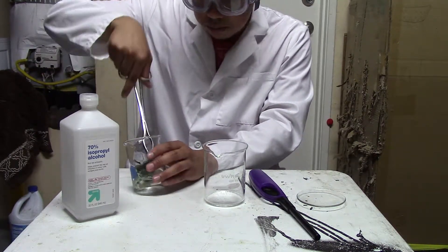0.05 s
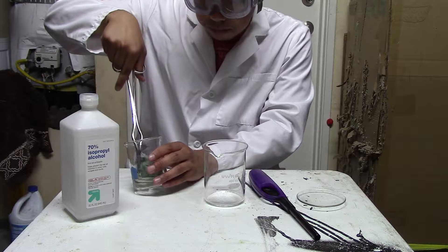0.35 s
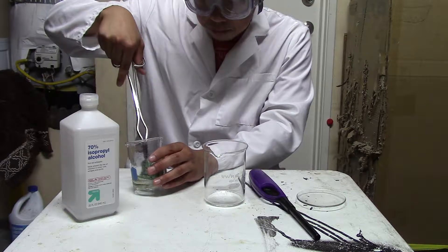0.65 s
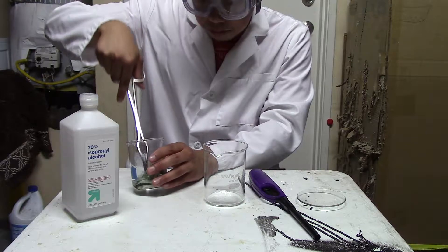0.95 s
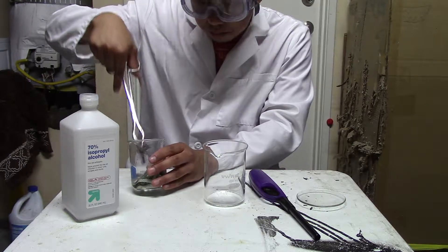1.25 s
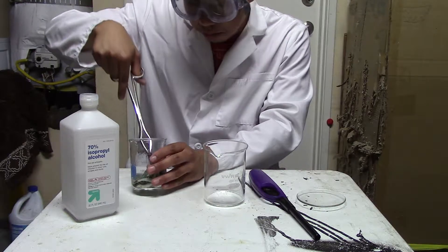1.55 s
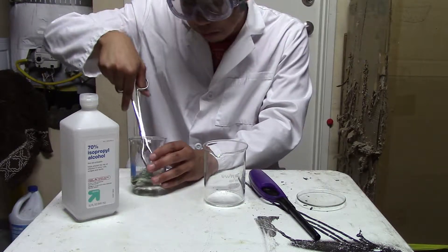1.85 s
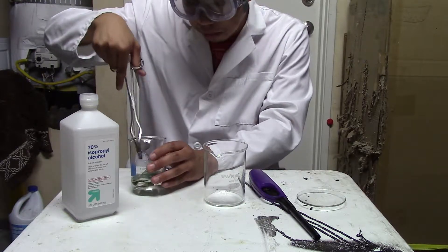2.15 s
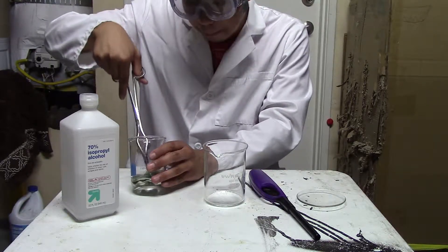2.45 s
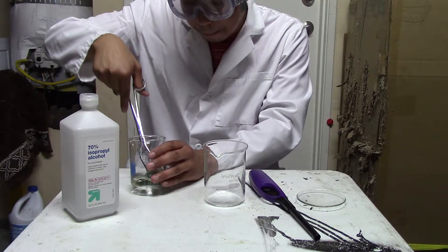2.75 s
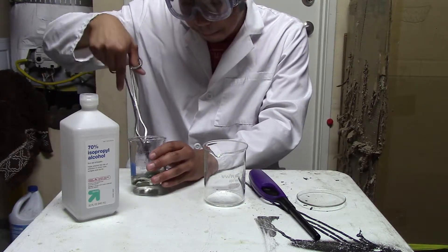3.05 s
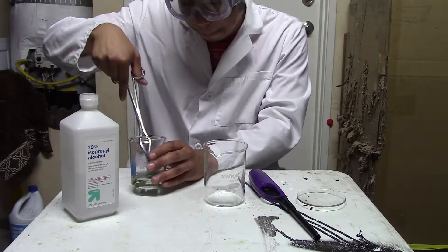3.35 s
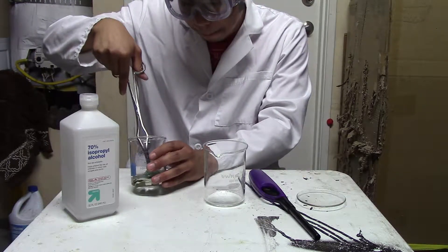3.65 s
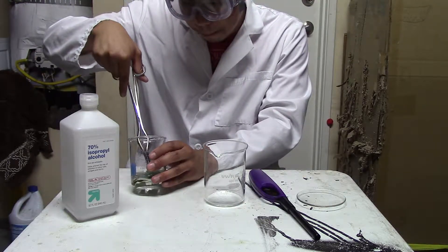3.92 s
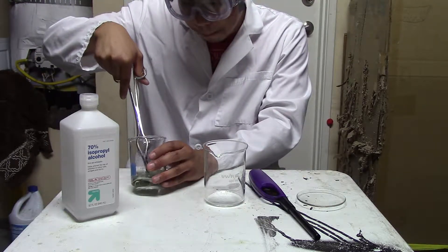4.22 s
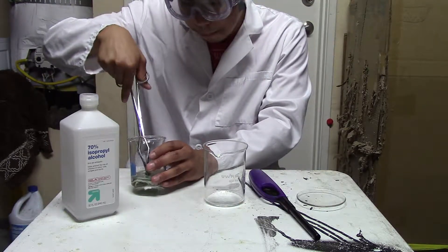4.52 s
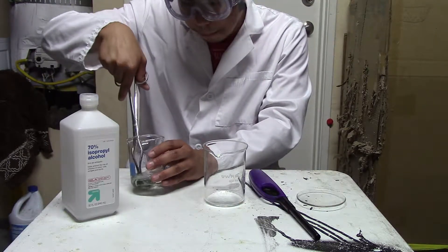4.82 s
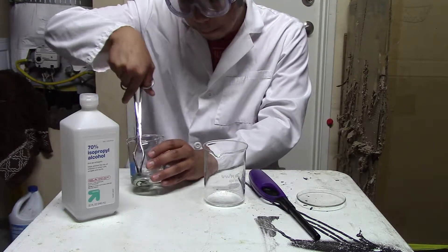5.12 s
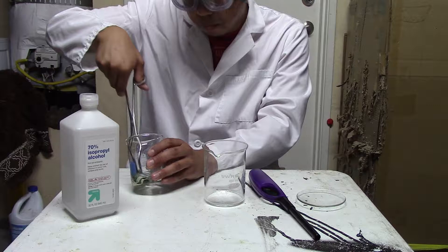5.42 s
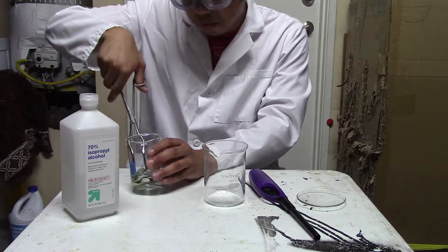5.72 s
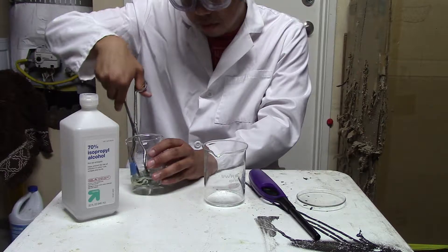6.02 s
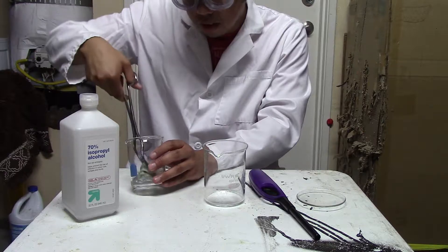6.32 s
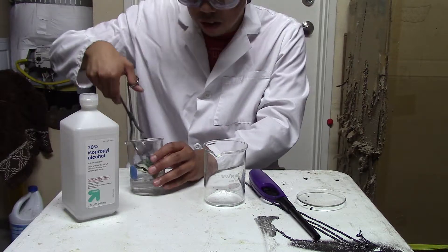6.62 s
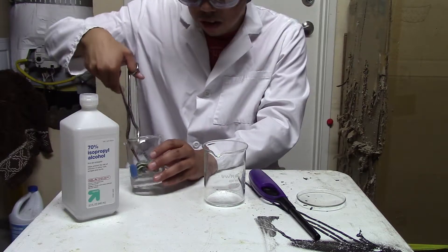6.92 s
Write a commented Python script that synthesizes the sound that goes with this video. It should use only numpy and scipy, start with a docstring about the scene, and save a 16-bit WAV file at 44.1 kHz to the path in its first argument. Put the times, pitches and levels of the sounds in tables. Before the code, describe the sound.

Short, bright clinks of metal tongs on a glass beaker, with soft rubbing and scraping between them, in a small, quiet room.

```python
"""Soft, hollow rubbing, then a bright clink: metal tongs poke at something soft in a glass beaker.
The tips strike the bottom and the wall, ringing tongs and glass and thumping the table underneath.
A hand damps the beaker, so the small, quiet room carries most of each tail. Between clinks the tongs
rub, prod, scrape and briefly squeal; the air in the beaker gives the rubbing its hollow note.
A faint motor whine comes and goes over steady room tone."""
import sys
import numpy as np
from scipy import signal
from scipy.fft import rfft, irfft
from scipy.io import wavfile
from scipy.ndimage import uniform_filter1d, minimum_filter1d

SR = 44100
rng = np.random.default_rng(int(sys.argv[2]) if len(sys.argv) > 2 else 0)


def to_wav(sig):
    """Store sig (one row per channel, or 1-D mono) as 16-bit WAV at the path in sys.argv[1].

    Samples outside -1..1 are clipped; the rate is SR.
    """
    pcm = np.clip(np.atleast_2d(sig), -1, 1) * 32767
    pcm = np.round(pcm).astype(np.int16)
    wavfile.write(sys.argv[1], SR, pcm.T)  # frames by channels


N = 307377

# blows of the tips; place runs from 0 (bottom) to 1 (wall), and a looser grip lets the glass ring longer:
# start_s, level_db, place, crack_db, t60_factor, bell_db, thud_db, bright_db_per_octave,
# accent_hz, accent_db, accent_width_octaves
CLINKS = [(1.0185, -22.5, 0.059, -6.5, 0.87, -6.5, -.5, -2.5, 9060, 4, .03),
          (1.743, -19, 0.21, -7.5, 0.75, 6.5, 0, -3, 7360, 7, .05),
          (2.6423, -33, 0.47, -12.5, 0.84, 3, -4, -5, 644, 4, 0.16),
          (2.762, -48, 0, 4, 0.5, -10, 19, -11, 349, 6, .2),
          (2.872, -46, 0.29, -2.5, 0.61, -2, -8.5, -5, 4500, 5, .2),
          (4.6265, -18, 0.66, 2.5, 0.51, 2, -6.5, 2.5, 4910, 5.5, 0.26),
          (5.3568, -60, 0.8, 0, 0.84, -5, -10, 3, 7440, 6, .04),
          (5.3941, -26, 1, -3.5, 1.3, -7, -26.5, -3, 10640, 2.5, .05),
          (5.8793, -28.5, 0.76, -2.5, 1.17, -10, -18.5, -5.5, 8500, 4, .25),
          (5.929, -56, 1, 7, .6, -5, -12, 3, 11800, 8, .2),
          (6.0657, -33.5, 0.19, -16.5, 0.73, 2, -1, -1, 3930, 0, .04),
          (6.2759, -53.5, 0.25, -5, 1, -10, 9, -4, 7940, 13, .07),
          (6.324, -54.5, 0, 3, 0.79, -7, 1, -2.5, 9300, 5, .04),
          (6.629, -51.5, 0.47, 1, 1.5, 8, -10, -10, 7950, -8, .05),
          (6.6856, -18, .25, -2.5, 0.71, 6.5, -15.5, -2, 7847, 15, .028)]
# damped modes of the tongs and the beaker: pitch_hz, t60_s, bottom_hit_db, wall_hit_db
BODY_MODES = [(243.8, 0.05, -35, -34), (350, 0.12, -16.5, -26.5), (465, 0.04, -20, -33),
              (531.7, 0.05, -14, -34), (629, 0.12, -17.5, -29.5), (860, 0.01, -22, -24.5),
              (1394, 0.031, -20, -14.5), (1409, 0.06, -15.5, -28.5), (1559, 0.027, -9.5, -37.5),
              (1744, 0.04, -17.5, -21), (1953, 0.03, -13.5, -28), (2348, 0.02, -11.5, -23.5),
              (2857, 0.05, -29, -29), (3710, 0.11, -24, -19), (3870, 0.045, -15.5, -21),
              (4143, 0.06, -13.5, -24.5), (4340, 0.049, -27, -32), (5190, 0.045, -33, -21),
              (6573, 0.036, -14, -20.5), (6740, 0.086, -16, -21), (6970, 0.045, -9, -7.5),
              (7373, 0.044, -12, -12), (7773, 0.055, -12.5, -16), (9038, 0.036, -7, -12.5),
              (10770, 0.049, -24.5, -15.5), (10996, 0.045, -17, -16), (11915, 0.043, -25.5, -25),
              (13350, 0.045, -20.5, -34), (15250, 0.03, -32.5, -34)]
# bell note of the glass wall, a close pair that beats: pitch_hz, t60_s, bottom_hit_db, wall_hit_db
BELL_MODES = [(3775, 0.12, -8.5, -18.5), (3850, 0.2, -14, -24)]
# tone of the short, noisy attack of a blow: frequency_hz, gain_db
CRACK_EQ = [(60, -45), (150, -24.5), (280, -5), (550, -2.5), (850, 1), (1200, -6.5), (1600, -5.5),
            (2600, -3), (4400, -1.5), (5900, -9), (7600, 4.5), (10000, -8), (11200, -3.5), (12500, -16.5),
            (16000, -29.5)]
# overall tone shared by all clinks: frequency_hz, gain_db
CLINK_EQ = [(80, 6.5), (200, 1.5), (350, 1), (800, -1), (1150, 0.5), (1550, 3.5), (2100, -1), (2800, -0.5),
            (4000, -3), (5200, -1.5), (6000, -3), (7000, 1), (9200, 2), (10000, 3), (11000, 1.5),
            (13200, 4.5), (14400, -4), (15300, 5.5), (16000, -1.5)]
# soft rubs inside the beaker: peak_s, swell_s, release_s, hollow_db, rustle_db
RUBS = [(.445, 0.075, 0.017, -52, -57.5), (.508, 0.026, 0.025, -47, -54), (.7, 0.036, 0.028, -60, -55.5),
        (.865, 0.1, 0.047, -56, -57), (1.01, 0.16, 0.017, -54, -52), (1.461, 0.005, .008, -70, -52.5),
        (1.574, 0.089, 0.088, -57.5, -55.5), (1.662, 0.017, .012, -41, -49),
        (1.688, 0.022, 0.014, -30.5, -57), (1.738, 0.025, .01, -54, -55), (1.985, 0.073, 0.021, -49.5, -61),
        (2.385, 0.031, 0.029, -58, -58.5), (2.595, 0.16, 0.1, -49.5, -73),
        (4.364, 0.058, 0.032, -49, -69.5), (6.51, 0.038, .06, -45.5, -55.5),
        (6.675, 0.075, .01, -56, -52.5)]
# dull pushes into the soft load: start_s, level_db
PRODS = [(1.532, -56), (2.38, -51.5), (3.325, -47), (4.863, -51.5), (6.906, -52)]
# resonances of the air in the beaker: pitch_hz, width_hz, gain_db
AIR_MODES = [(607.5, 300, -14), (965, 120, 4.5), (1028, 300, -7)]
# tone of the dry rustle: frequency_hz, gain_db
RUSTLE_EQ = [(200, -23), (700, -14.5), (1400, 0), (2000, 0.5), (2500, -7.5), (2950, -2.5), (3700, -11.5),
             (5500, -16), (8500, -12.5), (16000, -33.5)]
# tips dragging over the glass: peak_s, swell_s, release_s, level_db, tilt_db_per_octave, judder_db
SCRAPES = [(1.169, 0.068, 0.015, -39, 2, 12.5), (2.85, .07, 0.056, -43, 0, 24.5),
           (6.32, .17, 0.13, -51, -0.5, 13), (6.535, 0.082, 0.16, -54, 0, 8)]
# glide of a squealing tip: time_s, pitch_hz, level_db
SQUEAL_GLIDE = [(6.38, 5750, -62), (6.42, 6100, -65), (6.46, 6450, -66), (6.502, 6350, -71),
                (6.56, 5950, -57)]
# decay of the room: frequency_hz, t60_s
ROOM_DECAY = [(150, .55), (400, 0.29), (1000, 0.44), (2800, 0.35), (4500, 0.41), (7500, 0.41), (11000, 0.3),
              (16000, .21)]
# reverb against the direct sound: frequency_hz, wet_db
ROOM_WET = [(150, 1.5), (400, 7.5), (1500, -5), (3900, 0.5), (5300, -2), (7000, -8.5), (9000, -12),
            (15000, -3.5)]
# colour of the room tone: frequency_hz, gain_db
ROOM_TONE_EQ = [(12, -45.5), (20, -22), (101, -16.5), (138, -15), (172, -9), (262, -7), (422, -4.5),
                (472, -4.5), (513, -4), (949, -3.5), (1030, -6), (1400, -7), (5680, -16.5), (14700, -24.5),
                (16000, -44)]


def clinks(low_cut_hz=290, thump_trim_db=-48.5):
    """Each blow rings the tongs and the beaker, coloured by how the tips land, and thumps the table."""
    out = np.zeros(N)
    low_cut = signal.butter(2, low_cut_hz, "high", fs=SR, output="sos")  # small bodies radiate little bass
    for start_s, level_db, place, crack_db, t60_factor, bell_db, thud_db, *contact in CLINKS:
        clink = signal.sosfilt(low_cut, in_room(strike(place, crack_db, t60_factor, bell_db)))
        clink = colour(clink, lambda f: curve(CLINK_EQ, f) + contact_db(f, thud_db, *contact))
        thump = at_level(table_thump(), level_db + thud_db + thump_trim_db)
        add(out, start_s, at_level(clink, level_db) + thump)
    return out


def strike(place, crack_db, t60_factor=1, bell_db=0, scatter_db=.76, detune=.00079, contact_s=.0027):
    """One blow: the tips chatter for a few ms, and the modes of metal and glass ring on."""
    t = np.arange(SR // 3) / SR
    hz, t60, bottom_db, wall_db = np.transpose(BODY_MODES + BELL_MODES)[:, :, None]
    size, shift, phase = rng.standard_normal((3, len(hz), 1))
    level = amp(bottom_db + place * (wall_db - bottom_db) + scatter_db * size) / np.sqrt(t60)
    level[len(BODY_MODES):] *= amp(bell_db)
    cycles = hz * (1 + detune * shift) * t + phase
    modes = level * decay(t, t60 * t60_factor) * np.sin(2 * np.pi * cycles)
    ring = signal.sosfilt(signal.butter(3, 220, "high", fs=SR, output="sos"), modes.sum(0))
    chatter = np.exp(-(t / contact_s) ** 4) + amp(-8) * decay(t, t60_s=.074)
    burst = whiten(rng.standard_normal(len(t)) * chatter)
    crack = colour(burst, lambda f: curve(CRACK_EQ, f))
    return unit(ring) + amp(crack_db) * unit(crack)


def contact_db(f, thud_db, bright_db, accent_hz, accent_db, octaves, thud_hz=999, bright_hz=4000):
    """A downward blow thuds, a hard one is brighter, and the point of contact lifts or dips one band."""
    thud = thud_db / (1 + (f / thud_hz) ** 2)
    brightness = bright_db * np.log2(1 + f / bright_hz)
    accent = accent_db * np.exp(-(np.log2((f + 1) / accent_hz) / octaves) ** 2)
    return thud + brightness + accent


def table_thump(centre_hz=90, t60_s=.24):
    """The table top gives a little under the beaker: a short, low rumble."""
    t = np.arange(SR // 3) / SR
    push = rng.standard_normal(len(t)) * decay(t, t60_s)
    return colour(push, lambda f: -np.minimum(7 * np.log2((f + 1) / centre_hz) ** 2, 70))


def rubs(trim_db=-2):
    """Friction in the beaker rustles and stirs the air inside into a hollow note."""
    hollow_gain, rustle_gain = np.zeros(N), np.zeros(N)
    for *timing, hollow_db, rustle_db in RUBS:
        start_s, pressure = stroke(*timing)
        add(hollow_gain, start_s, pressure * amp(hollow_db))
        add(rustle_gain, start_s, pressure * amp(rustle_db))
    hollow = colour(friction(N, slips_per_s=3000, spread_db=3), beaker_air_db)
    hollow /= np.sqrt(uniform_filter1d(hollow ** 2, size=700))  # steady pressure keeps the note even
    grain = friction(N, slips_per_s=710, spread_db=5.5, hiss=.95)
    rustle = unit(colour(grain, lambda f: curve(RUSTLE_EQ, f)))
    return amp(trim_db) * (hollow_gain * hollow + rustle_gain * rustle)


def prods(trim_db=-4, tick_db=-15):
    """A push into the soft load rings the air in the beaker: a dull pop with a small dry tick."""
    out, t = np.zeros(N), np.arange(SR // 20) / SR
    pop = unit(colour(signal.unit_impulse(len(t)), beaker_air_db))
    for start_s, level_db in PRODS:
        burst = rng.standard_normal(len(t)) * decay(t, t60_s=.03)
        tick = unit(colour(burst, lambda f: curve(RUSTLE_EQ, f)))
        add(out, start_s, amp(level_db + trim_db) * (pop + amp(tick_db) * tick))
    return out


def beaker_air_db(f):
    """The air in the beaker resonates in a few broad peaks."""
    power = sum(amp(db) ** 2 / (1 + (2 * (f - hz) / width) ** 2) ** 2 for hz, width, db in AIR_MODES)
    return 10 * np.log10(power + 1e-7)


def scrapes(trim_db=-2, pivot_hz=2000, judder_hz=1780, judder_width_hz=75):
    """Slipping tips excite the same modes as a blow, more dully, and make the arms of the tongs judder."""
    out = np.zeros(N)
    for *timing, level_db, tilt_db, judder_db in SCRAPES:
        def drag_db(f):
            judder = judder_db / (1 + ((f - judder_hz) / judder_width_hz) ** 2)
            dulling = 3 * np.log2(1 + f / pivot_hz)
            return judder - dulling + tilt_db * np.log2(np.maximum(f, 400) / pivot_hz)

        start_s, pressure = stroke(*timing)
        body = colour(strike(place=0, crack_db=-3, bell_db=-5), drag_db)
        slips = friction(2 * SR)[:len(pressure)]
        scrape = unit(signal.fftconvolve(slips, body)[:len(slips)])
        add(out, start_s, amp(level_db + trim_db) * pressure * scrape)
    return out


def friction(count, slips_per_s=700, spread_db=4, hiss=.4):
    """Tiny slips of uneven size over a smooth hiss."""
    size = amp(spread_db * np.minimum(rng.exponential(1, count), 3))
    slipping = rng.random(count) < slips_per_s / SR
    slips = unit(size * slipping * rng.choice([-1, 1], count))
    return unit(slips + hiss * rng.standard_normal(count))


def stroke(peak_s, swell_s, release_s, depth_db=14.5):
    """Pressure builds by depth_db over the swell and falls as much over the release: start time, gain."""
    t = np.arange(-3 * swell_s, 3 * release_s, 1 / SR)
    from_peak = np.maximum(-t / swell_s, t / release_s)
    return max(peak_s + t[0], 0), amp(-depth_db * from_peak ** 1.3)


def squeal(jitter=.013, octave_db=-11, trim_db=-3):
    """A tip sticks and slips fast and almost regularly: a thin gliding tone with its octave."""
    time_s, pitch_hz, level_db = np.transpose(SQUEAL_GLIDE)
    out, t = np.zeros(N), np.arange(time_s[0], time_s[-1], 1 / SR)
    waver = 1 + jitter * unit(uniform_filter1d(rng.standard_normal(len(t)), size=60))
    phase = 2 * np.pi * np.cumsum(np.interp(t, time_s, pitch_hz) * waver) / SR
    tone = np.sin(phase) + amp(octave_db) * np.sin(2 * phase)
    add(out, time_s[0], amp(np.interp(t, time_s, level_db) + trim_db) * tone)
    return out


def motor_whine(pitch_hz=5561, level_db=-73.5, step_s=1 / 15, run_chance=.42, tick_hz=2250):
    """A small motor runs or rests at random in even steps, whining and ticking as it starts and stops."""
    t, tick_t = np.arange(N) / SR, np.arange(SR // 30) / SR
    steps = np.arange(.045, N / SR, step_s)
    chance, softness = rng.random((len(steps), 2)).T
    running = 1. * (chance < run_chance)
    burst = rng.standard_normal(len(tick_t)) * decay(tick_t, t60_s=.02)
    tick = unit(colour(burst, lambda f: -np.minimum(50 * np.log2((f + 1) / tick_hz) ** 2, 25)))
    ticks = np.zeros(N)
    for start_s, switch, tick_db in zip(steps, np.diff(running, prepend=0), -65 - 12 * softness):
        add(ticks, start_s, switch * amp(tick_db) * tick)
    gate = uniform_filter1d(running[np.searchsorted(steps, t) - 1], size=200)
    return ticks + amp(level_db) * gate * np.sin(2 * np.pi * pitch_hz * t)


def room_tone(level_db=-59):
    """A steady, soft bed of room noise."""
    gain = amp(curve(ROOM_TONE_EQ, np.fft.rfftfreq(N, 1 / SR)))
    return amp(level_db) * unit(irfft(rfft(rng.standard_normal(N)) * gain, N))


def in_room(x, predelay_s=.0019, build_s=.0075):
    """Direct sound plus dense reflections that build up after a gap and die fastest in the top end."""
    t = np.arange(SR // 2) / SR
    reflections = rng.standard_normal(len(t)) * (rng.random(len(t)) < .15)
    hz, age_s, bands = signal.stft(unit(reflections), SR, nperseg=256)
    t60 = curve(ROOM_DECAY, hz)[:, None]
    bands *= amp(curve(ROOM_WET, hz)[:, None]) * decay(age_s, t60)
    bands *= np.sqrt(np.log(1e6) / t60 / SR)  # a longer tail holds no more energy
    response = signal.istft(bands, SR, nperseg=256)[1][:len(t)]
    response *= np.clip((t - predelay_s) / build_s, 0, 1)
    response[0] = 1  # the direct sound
    return signal.fftconvolve(x, response)[:len(x)]


def colour(x, db_at):
    """Minimum-phase EQ with the gain db_at(hz): nothing sounds before a blow."""
    log_gain = np.log(amp(db_at(abs(np.fft.fftfreq(4096, 1 / SR)))))
    taps = np.fft.ifft(np.exp(signal.hilbert(log_gain).conj())).real
    return signal.fftconvolve(x, taps[:len(taps) // 2])[:len(x)]


def whiten(burst):
    """Evens out broad humps in the spectrum of a burst, so that it has no pitch."""
    hz = np.fft.rfftfreq(len(burst), 1 / SR)
    power = uniform_filter1d(abs(rfft(burst)) ** 2, size=120)
    return unit(colour(burst, lambda f: -10 * np.log10(np.interp(f, hz, power))))


def curve(points, hz):
    """Reads (frequency_hz, value) points on a log-frequency axis."""
    f, value = np.transpose(points)
    return np.interp(np.log(hz + 1), np.log(f + 1), value)


def decay(t, t60_s):
    """Falls by 60 dB in t60_s."""
    return np.exp(-np.log(1000) * t / t60_s)


def amp(db):
    """Decibels to gain."""
    return 10 ** (np.asarray(db) / 20)


def unit(x):
    """Scales to rms 1."""
    return x / np.sqrt(np.mean(x ** 2) + 1e-20)


def at_level(sound, level_db):
    """Scales a hit so that its energy, spread over 0.1 s, has this rms level."""
    return amp(level_db) * sound / np.sqrt(np.sum(sound ** 2) / (SR / 10))


def add(mix, start_s, sound):
    """Mixes a sound in at start_s."""
    part = mix[round(start_s * SR):][:len(sound)]
    part += sound[:len(part)]


def scene():
    """Mono mix: clinks up front, friction behind them in the same room, whine and room tone beneath."""
    tongs = clinks() + in_room(rubs() + prods()) + in_room(scrapes()) + in_room(squeal())
    return (tongs + motor_whine() + room_tone())[None]


def record(dry, high_cut_hz=16100):
    """A fast limiter holds the loudest peaks at full scale, then a steep high cut trims the top."""
    gain = uniform_filter1d(minimum_filter1d(1 / np.maximum(abs(dry), 1), size=45), size=45)
    high_cut = signal.firwin(255, high_cut_hz, window=("kaiser", 9), fs=SR)
    return signal.oaconvolve(dry * gain, high_cut[None], "same")


dry = scene()
out = record(dry)
to_wav(out)
```